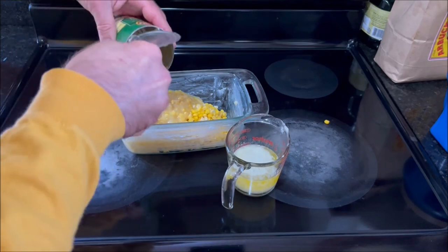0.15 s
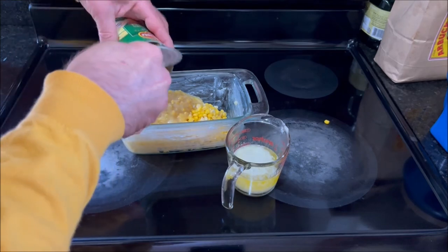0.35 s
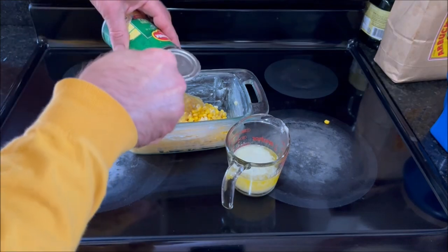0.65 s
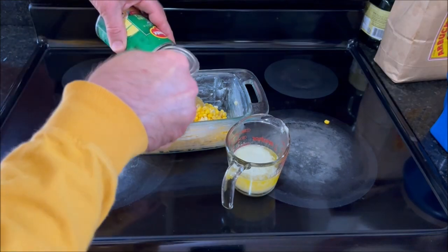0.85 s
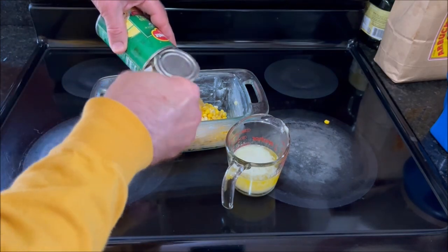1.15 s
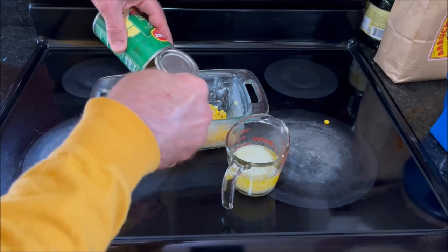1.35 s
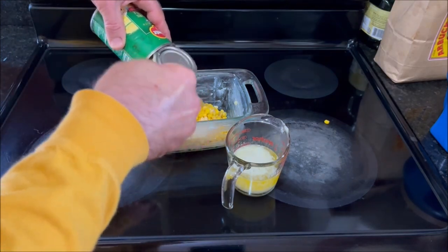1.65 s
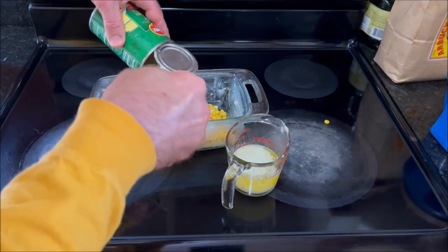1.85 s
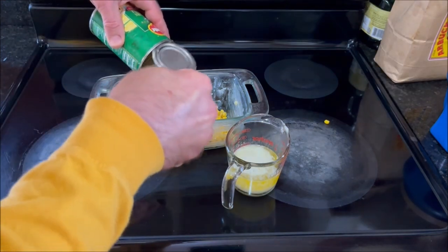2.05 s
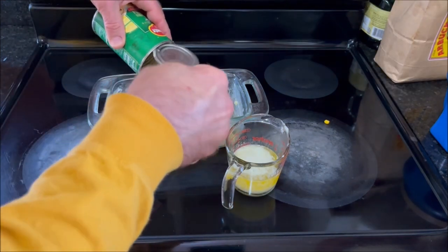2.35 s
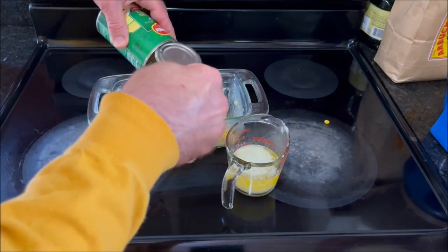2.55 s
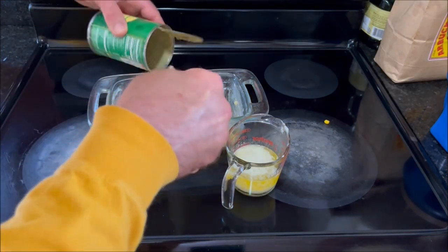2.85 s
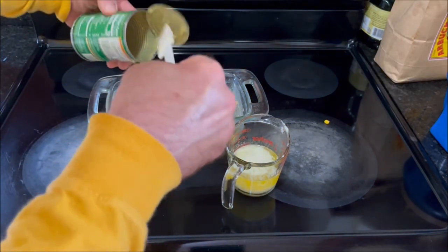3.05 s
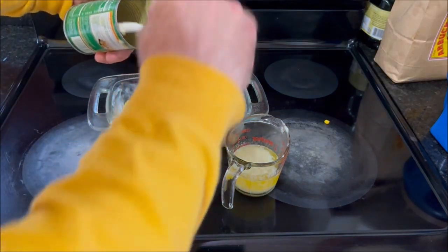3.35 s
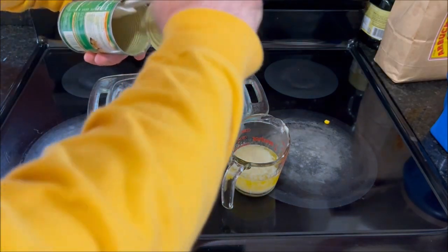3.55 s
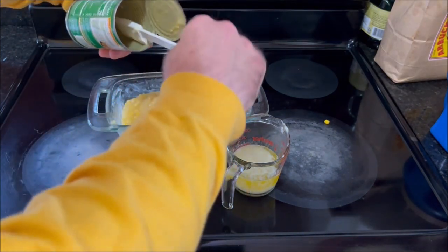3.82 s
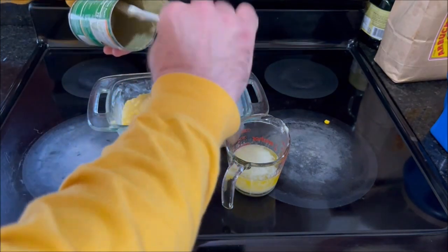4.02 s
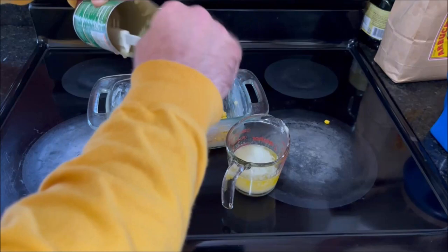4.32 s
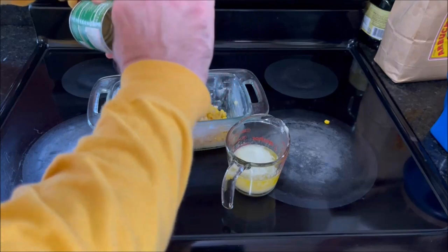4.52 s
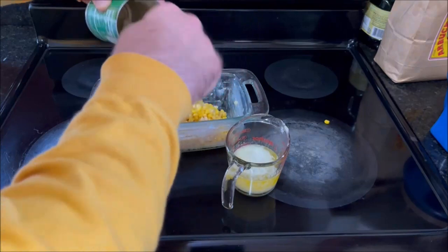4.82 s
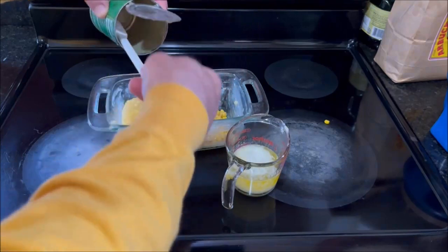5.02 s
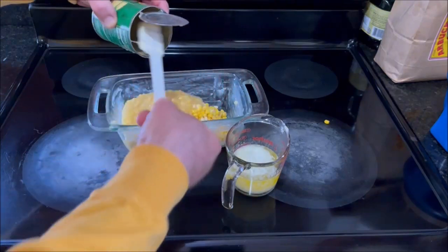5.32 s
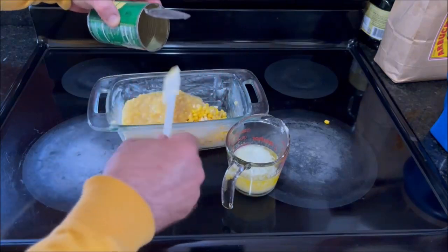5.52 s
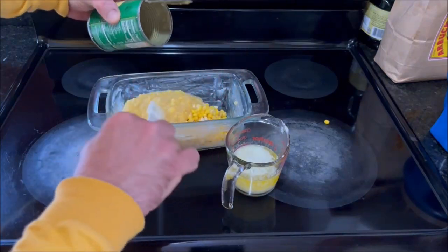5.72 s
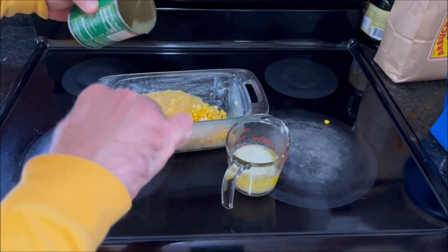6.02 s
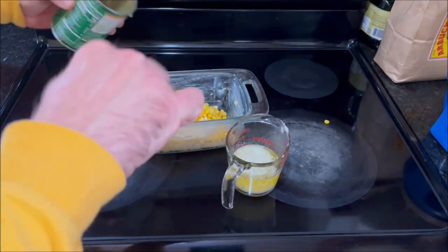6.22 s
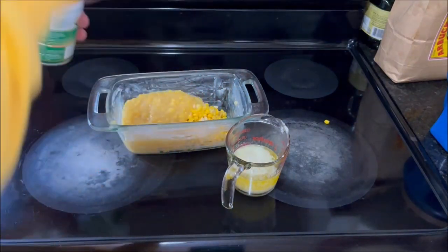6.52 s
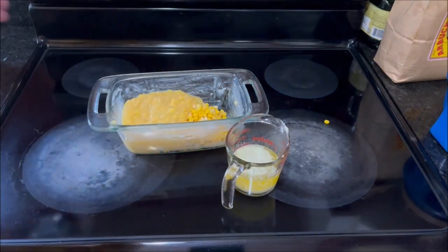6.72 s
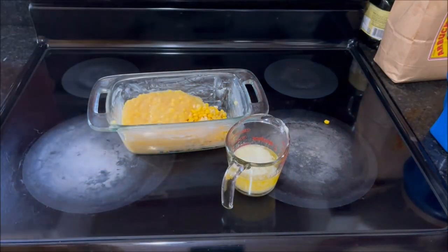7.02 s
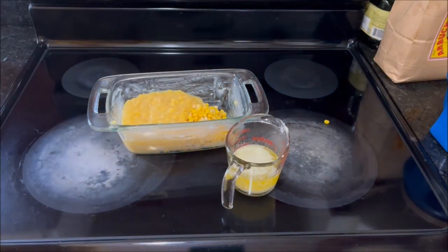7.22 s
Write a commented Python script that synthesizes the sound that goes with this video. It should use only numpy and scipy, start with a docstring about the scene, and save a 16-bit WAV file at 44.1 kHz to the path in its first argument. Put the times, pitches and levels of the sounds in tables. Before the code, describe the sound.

Close hollow metallic knocks and gritty scrapes from a spatula emptying a tin can, then soft dish thuds, a pause, and ringing final taps.

```python
"""A quiet kitchen, close on a tin can of thick creamed corn held over a stove, heard through two microphone ports.
A low hum and a wavering hiss lie under a spatula that slides and knocks in the can from the start: wall, end panel
and air column ring, with short bright crackles. The lid sings after jolts; firm drags groan and rasp, the air note
sinking while the blade blocks the mouth. Later the blade's edge ticks over ribs and rim, the spatula thuds dully into
the corn in a dish, then knocks the can again. Noise, grains and damped sines make the sounds, with a short kitchen tail."""
import sys
import numpy as np
from scipy import signal
from scipy.fft import rfft, irfft, next_fast_len
from scipy.io import wavfile
from scipy.ndimage import uniform_filter1d, map_coordinates

SR = 44100
rng = np.random.default_rng(int(sys.argv[2]) if len(sys.argv) > 2 else 0)


def store_pcm(level_fs):
    """Save levels as 16-bit WAV."""
    pcm = np.round(np.clip(level_fs, -1, 1) * 32767).astype(np.int16)
    wavfile.write(sys.argv[1], SR, np.atleast_2d(pcm).T)


N = 325281
TIME = np.arange(N) / SR
RING = TIME[:SR // 3]  # time axis of one contact
ATTACK = SR // 40  # samples over which most contacts are levelled

# Spectrum of the room's own tone. Each row: frequency in Hz, relative level in dB.
ROOM_TONE = [(20, -15.5), (70, 3), (150, -8.5), (380, -19), (700, -33.5), (2000, -43), (6000, -63)]
ROOM_TONE_DB = -59

# Light sliding and background hiss. Each row: start in seconds, nominal contact level in dB, nominal hiss in dB.
SLIDE_AND_HISS = [(0.0, -50, -69.5), (0.61, -63, -68.5), (1.599, -64.5, -81.5), (1.89, -96, -89.5),
                  (2.18, -59, -91), (2.403, -57.5, -68.5), (3.41, -82, -80.5), (3.851, -84.5, -87.5),
                  (4.681, -63, -81.5), (5.22, -59.5, -75), (5.571, -75.5, -83.5), (6.26, -100, -89.5),
                  (6.661, -70.5, -77), (6.938, -52, -68), (7.38, -53, -72)]
# Colour of the background hiss. Each row: frequency in Hz, relative level in dB.
HISS = [(1700, -3), (2250, 8), (2650, 9), (3000, -1), (6000, -1), (14200, 1), (15600, -9)]
# Pitch of the air column, lower while blade and corn block the mouth. Each row: time in seconds, frequency in Hz.
AIR_NOTE = [(.5, 655), (.93, 594.8), (1.48, 594), (1.66, 636.4), (2.06, 595.8), (3, 645), (4.82, 667.7),
            (4.955, 607), (4.995, 651), (6.85, 662.6)]
# kernels caught under the blade: level against the sliding, ring time of the air, share by which its note varies
CATCH_DB, CATCH_T60_S, CATCH_DETUNE = 1, 0.047, 0.097

# Modes of the tin wall. Each row: frequency in Hz, relative level in dB.
TIN_MODES = [(1340, 10.5), (1860, 4.5), (2170, 3), (2800, 3.5), (3510, 1.5), (3780, -5), (4600, -1.5),
             (5050, 0), (5850, -4.5)]
# Colour of the wall's dense crack. Each row: frequency in Hz, relative level in dB.
CRACK = [(200, 0.5), (450, 11), (850, 14), (1150, 1), (1800, 7.5), (2300, 1.5), (5300, -3.5), (7500, -7),
         (9000, -42.5)]
# each mode splits into a cluster around the seam and ribs: share of spread, ring time
MODE_SPREAD, MODE_T60_S = .02, .05

# Spatula hits on the can. Each row: start in seconds, then nominal levels in dB of the air column,
# the end panel, the tin wall and the treble of the contact.
CAN_KNOCKS = [(0.086, -34, -46, -50.5, -76), (0.198, -39, -62, -49.5, -44),
              (0.241, -26.5, -40.5, -40.5, -29.5), (0.524, -41, -75, -49, -53),
              (0.887, -32.5, -59.5, -53, -63.5), (1.071, -39, -71.5, -57, -62),
              (1.234, -19, -42.5, -40.5, -36), (1.412, -29.5, -64, -53.5, -47.5),
              (1.423, -36.5, -75, -45, -51), (1.477, -35, -52, -49, -52.5), (2.05, -47, -62, -72, -90.5),
              (2.19, -38, -50.5, -53.5, -58.5), (2.755, -40, -73, -68.5, -78),
              (3.579, -43, -82, -51, -47.5), (3.666, -38, -41.5, -42.5, -36.5),
              (4.167, -41.5, -63.5, -60.5, -63.5), (4.765, -62, -56, -56, -68),
              (5.208, -36.5, -31.5, -50, -58.5), (6.833, -31.5, -23, -47, -59),
              (6.949, -31.5, -32, -38.5, -30), (7.111, -48, -39.5, -52, -43), (7.141, -65, -44, -45.5, -38),
              (7.257, -36.5, -40, -43, -45)]
# trims on those levels for air column, end panel and wall
KNOCK_AIR_DB, KNOCK_PANEL_DB, KNOCK_WALL_DB = -5, -5.5, 2.5
AIR_LAG_S = .0018  # the air answers a moment after the wall
# Corn clinging inside the can. Each row: time in seconds, share from 0 to 1.
CORN_LEFT = [(2.4, 0.7), (3.5, 0.38)]
# Colour of bright spatter. Each row: frequency in Hz, relative level in dB.
SPATTER = [(3000, -20), (6500, -5), (9300, 1), (14200, 0), (16000, -8)]
# spatter of a knock: base level in an empty can, gain when fully coated, dB per dB of treble
SPATTER_DB, SPATTER_COATED_DB, SPATTER_GROWTH = -34, 17, 0.69

# Short bright crackles, some at the attack of a hard knock, some between knocks.
# Each row: start in seconds, nominal crackle in dB, click in dB.
CRACKLES = [(0.242, -26.5, -47), (1.072, -53, -80), (1.235, -52, -48), (1.5896, -53, -50.5),
            (1.6286, -48, -47.5), (1.7663, -47, -78), (2.192, -49, -82), (2.5184, -50.5, -55.5),
            (2.957, -47.5, -58.5), (2.9702, -46, -57), (3.09, -55, -71.5), (3.185, -57.5, -82),
            (3.231, -56.5, -95), (4.603, -61, -58.5), (5.124, -36.5, -54)]
CRACKLE_DB = -9  # trim on the nominal crackle

# Jolts ring the hinged lid at a note set by its bend. Each row: start in seconds, centre frequency in Hz, level in dB.
LID_RINGS = [(0.523, 1845, -52), (1.236, 5040, -43.5), (1.414, 2930, -50), (1.48, 1910, -48),
             (2.19, 2169, -61.5), (2.192, 5090, -64.5), (3.363, 1924, -65.5), (3.668, 1399, -43.5),
             (4.416, 2440, -72), (5.123, 1793, -50.5), (6.95, 5270, -45.5), (7.114, 1720, -49.5)]
LID_T60_S, LID_WAVER = 0.15, 0.045  # ring time, share by which the note wavers

# Firm drags of the blade. Each row: middle in seconds, length in seconds, nominal air column in dB, nominal rasp in dB.
RUBS = [(0.695, 0.015, -42, -53), (0.754, 0.045, -51, -50), (0.905, 0.0051, -36.5, -63),
        (0.932, 0.014, -31.5, -51.5), (0.966, 0.022, -42.5, -47), (1.162, 0.0058, -39.5, -56.5),
        (1.183, 0.0083, -31.5, -44), (1.391, 0.0047, -36.5, -55), (1.644, 0.013, -41.5, -53.5),
        (1.681, 0.018, -42, -46), (1.713, 0.0046, -38.5, -51), (1.813, 0.0016, -43, -86),
        (2.337, 0.016, -50.5, -67), (2.616, 0.0045, -44.5, -59.5), (2.853, 0.0075, -50, -75),
        (3.024, 0.012, -52.5, -64), (3.785, 0.008, -41.5, -64), (3.825, 0.015, -53, -56),
        (4.274, 0.023, -52.5, -60.5), (4.431, 0.02, -50, -57.5), (4.811, 0.038, -47, -53.5),
        (4.976, 0.022, -37, -49), (4.995, 0.019, -29.5, -57.5), (5.112, 0.018, -66, -50.5),
        (5.17, 0.025, -61, -47), (6.779, 0.0048, -41.5, -57)]
# wet crackle of a drag against its rasp: level in an empty can, gain when fully coated
RUB_WET_DB, RUB_COATED_DB = -14, 2
# the bite ahead of each drag: extra lead time, level against the drag's slips, decay
BITE_LEAD_S, BITE_DB, BITE_T60_S = .008, -1, 0.06
BLADE_BEND = 0.012  # share by which the wall modes wander under the travelling blade

# The edge skipping over ribs and rim. Each row: start in seconds, resonance in Hz, level in dB.
EDGE_TICKS = [(3.228, 4470, -65), (3.362, 2780, -68), (4.234, 4800, -59.5), (4.297, 3080, -58.5),
              (4.765, 2220, -67), (5.098, 3700, -49), (5.124, 3350, -44), (5.144, 4970, -44.5),
              (5.165, 5300, -56.5), (5.194, 4840, -50), (7.111, 3500, -47.5), (7.203, 5030, -46),
              (7.217, 5000, -41.5)]
TICK_CHATTER_S, TICK_T60_S = .05, .006  # 60 dB decay of the chatter, and of its resonance

# Soft thuds in the dish. Each row: start in seconds, frequency in Hz, level in dB.
THUDS = [(5.943, 127, -43.5), (5.998, 382, -52.5)]

# The can at the two microphone ports. Each row: frequency in Hz, left minus right in dB, left's phase lead in radians.
PORTS = [(100, .5, 0), (600, 6, .5), (1100, 1, -.8), (1900, 2, -6), (3600, 5, -5.1), (4800, 7, -6.1),
         (8300, .5, -9.4), (15500, 0, -15.6)]
# Kitchen reverberation. Each row: band centre in Hz, level against the direct sound in dB, 60 dB decay in seconds.
KITCHEN = [(150, -11, .45), (650, -6, .38), (1500, -3, .42), (5000, -5, .4), (12000, -12, .3)]
TOP_HZ = 15900  # upper limit of the recorder


def undb(db):
    """Decibels to gain."""
    return 10 ** (np.asarray(db) / 20)


def level(x, db, size=N):
    """Scale a sound so that its first samples have this rms level."""
    return x * undb(db) / np.sqrt(np.mean(x[..., :size] ** 2) + 1e-20)


def fade(t, t60):
    """Exponential decay, 60 dB in t60 seconds."""
    return np.exp(-np.log(1000) * t / t60)


def at(curve, s):
    """Value of a control curve at time s."""
    return np.interp(s, *np.transpose(curve))


def over_hz(table, size):
    """Columns of a table along the frequency axis of a sound of this size."""
    hz, *columns = np.transpose(table)
    log_hz = np.log(np.fft.rfftfreq(size, 1 / SR) + 1)
    return [np.interp(log_hz, np.log(hz), c) for c in columns]


def colour(x, table, size=1024):
    """Causal filter with the given spectrum, made minimum phase by folding its cepstrum."""
    cepstrum = irfft(np.log(undb(over_hz(table, size)[0])))
    cepstrum[1:size // 2] *= 2
    cepstrum[size // 2 + 1:] = 0
    impulse = irfft(np.exp(rfft(cepstrum)))
    return signal.fftconvolve(x, impulse)[:len(x)]


def resonate(x, hz, t60):
    """One damped mode driven by x."""
    pole = np.exp((2j * np.pi * hz - np.log(1000) / t60) / SR)
    return signal.lfilter([1], [1, -pole], x).real


def struck(hz, t60, build):
    """A mode that builds up over a short push and dies away."""
    return np.sin(2 * np.pi * hz * RING) * fade(RING, t60) * (1 - fade(RING, build))


def walk(rate, size=N):
    """Smooth random wander with a spread near 1."""
    hold = max(int(SR / rate), 1)
    steps = np.repeat(rng.standard_normal(size // hold + 2), hold)
    return uniform_filter1d(steps, hold)[:size] * np.sqrt(3 / 2)


def grains(per_s, spread_db, size=N):
    """Tiny impulses at random moments, some larger than the rest."""
    size_db = spread_db * rng.uniform(-1, 1, size)
    happens = rng.random(size) < per_s / SR
    return happens * np.sign(rng.standard_normal(size)) * undb(size_db)


def add(track, s, x):
    """Mix a sound into a track from time s on."""
    start = max(int(s * SR), 0)
    track[start:start + len(x)] += x[:max(N - start, 0)]


def room_tone():
    """Low rumble, most alike at both ports in the bass, with a wavering hum and a trace of hiss."""
    mid, side = rfft(rng.standard_normal((2, N)))
    width = undb(over_hz([(60, -18), (130, -13), (300, -7), (1000, -1)], N)[0])
    pair = (mid + width * side * np.array([[1], [-1]])) * undb(over_hz(ROOM_TONE, N)[0])
    hum = 0
    for hz, db in [(70, -62.0), (122, -76.5)]:
        strength = undb(db + walk(21))
        hum = hum + strength * np.sin(2 * np.pi * hz * TIME + 2.0 * walk(5.0))
    return level(irfft(pair, N), ROOM_TONE_DB) + hum


def background_hiss():
    """A background hiss of coloured noise that rises and falls, strongest near 2.5 kHz."""
    s, _, hiss_db = np.transpose(SLIDE_AND_HISS)
    hiss = colour(rng.standard_normal(N), HISS) * undb(2 * walk(120) + 1.5 * walk(12))
    return level(hiss, 1.2) * undb(np.interp(TIME, s, hiss_db))


def tin(force, modes_db):
    """The wall answers with a dense crack and with clusters of close modes that differ from contact to contact."""
    hz, db = np.repeat(TIN_MODES, 6, axis=0).T[:, :, None]
    detune, sign = rng.standard_normal((2, *hz.shape))
    waves = np.sin(2 * np.pi * hz * (1 + MODE_SPREAD * detune) * RING)
    modes = (undb(db) * np.sign(sign) * waves).sum(0)
    ringing = signal.fftconvolve(force, modes * fade(RING, MODE_T60_S))[:len(force)]
    return level(colour(force, CRACK), 0) + level(ringing, modes_db)


def catches(count):
    """Each kernel that catches finds the mouth covered differently and sounds its own short hollow note."""
    out = np.zeros(N)
    times = rng.uniform(0, N / SR, count)
    for s, (detune, strength) in zip(times, rng.standard_normal((count, 2))):
        note = struck(at(AIR_NOTE, s) * (1 + CATCH_DETUNE * detune), CATCH_T60_S, 0.03)
        add(out, s, note * undb(3 * strength))
    return out


def slide():
    """Light contact keeps the can murmuring; kernels catch in small hollow blips."""
    s, contact_db, _ = np.transpose(SLIDE_AND_HISS)
    grit = tin(grains(per_s=900, spread_db=9), modes_db=-6) * undb(4.5 * walk(40))
    # the hand shifts its grip with a dull rustle
    grip = colour(rng.standard_normal(N), [(100, -12), (220, 0), (480, 0), (2000, -45)])
    contact = level(grit, -13.5) + level(catches(count=450), CATCH_DB) + level(grip, -10.0)
    return contact * undb(np.interp(TIME, s, contact_db))


def knocks():
    """Each hit chatters briefly and rings wall, end panel and air; the emptier the can, the less it spatters."""
    out = np.zeros(N)
    for s, ring_db, panel_db, wall_db, treble_db in CAN_KNOCKS:
        air_hz, air_db = at(AIR_NOTE, s), ring_db + KNOCK_AIR_DB
        chatter = grains(per_s=15000, spread_db=0.5, size=len(RING))
        chatter = chatter * fade(RING, 0.051) * (1 - fade(RING, 0.011))
        wall = level(tin(chatter, modes_db=-8.5), wall_db + KNOCK_WALL_DB, size=ATTACK)
        # a hard contact is short and bright, one cushioned by corn is dull
        hardness_db = treble_db - wall_db
        wall = colour(wall, [(800, -2), (2300, 0), (4800, hardness_db + 2), (9000, hardness_db - 2)])
        # a blade deep in the mouth lowers and damps the air column, and bends the hand-held body more
        opening = air_hz / 650
        air = level(struck(air_hz, 0.065 * opening ** 8, 0.18), air_db, size=ATTACK)
        flex_db = air_db - 11.0 + 70 * (1 - opening)
        flex = level(struck(535, 0.047, 0.076), flex_db, size=ATTACK)
        panel = struck(874, 0.105, 0.04) + undb(-1) * struck(780, 0.025, 0.015)
        panel = level(panel, panel_db + KNOCK_PANEL_DB, size=ATTACK)
        wet_db = SPATTER_DB + SPATTER_COATED_DB * at(CORN_LEFT, s) + SPATTER_GROWTH * treble_db
        spatter = level(colour(chatter, SPATTER), wet_db, size=ATTACK)
        add(out, s, wall + panel + spatter)
        add(out, s + AIR_LAG_S, air + flex)
    return out


def crackles():
    """Short bright crackles, some at the attack of a hard knock, some between knocks, from bursts of dense grains."""
    out = np.zeros(N)
    for s, crackle_db, click_db in CRACKLES:
        burst = grains(per_s=17000, spread_db=5.5, size=len(RING))
        burst = burst * fade(RING, 0.057) * (1 - fade(RING, 0.0024))
        crackle = level(colour(burst, SPATTER), crackle_db + CRACKLE_DB, size=ATTACK // 3)
        click = level(colour(burst, CRACK), click_db, size=ATTACK // 3)
        add(out, s, crackle + click)
    return out


def lid():
    """The thin lid sings on after a jolt, its note wavering as it flaps."""
    out = np.zeros(N)
    for s, hz, db in LID_RINGS:
        pitch = hz * (1 + LID_WAVER * walk(450, size=len(RING)))
        note = np.sin(2 * np.pi * np.cumsum(pitch) / SR) * fade(RING, LID_T60_S)
        add(out, s, level(note, db, size=ATTACK))
    return out


def bend(x, share):
    """Let all resonances of a sound wander together by this share; its middle stays in place."""
    place = np.cumsum(1 + share * walk(45, size=len(x)))
    middle = len(x) // 2
    return map_coordinates(x, [place - place[middle] + middle])


def rubs():
    """The blade bites, then sticks and slips: the air swells into a short hollow groan under a gritty rasp."""
    out, t = np.zeros(N), RING - RING.mean()
    for s, length, air_db, rasp_db in RUBS:
        air_hz = at(AIR_NOTE, s)
        swell = 1 / np.cosh(2 * t / max(length, .004))
        since_bite = t + length + BITE_LEAD_S
        bite = (since_bite > 0) * fade(np.abs(since_bite), BITE_T60_S) * undb(BITE_DB)
        pitch = at(AIR_NOTE, s + t) * (1 + .02 * walk(120, size=len(t)))
        groan = np.sqrt(2) * np.sin(2 * np.pi * np.cumsum(pitch) / SR)
        groan = groan * undb(2 * walk(160, size=len(t)))
        slips = (swell + bite) * grains(per_s=5000, spread_db=9, size=len(t))
        slips = slips * undb(4.5 * walk(220, size=len(t)))
        # deep in the can the air note is low and the wall modes sing; near the rim the end panel rings instead
        depth_db = np.clip((635 - air_hz) / 10, -3, 3)
        panel = level(resonate(slips, 864.3, 0.22), rasp_db - 11.0 - 2 * depth_db)
        wall = bend(tin(slips, depth_db - 3.0), BLADE_BEND)
        flex = level(resonate(slips, 579, 0.15), rasp_db - 4.5)
        wet_db = rasp_db + RUB_WET_DB + RUB_COATED_DB * at(CORN_LEFT, s)
        spatter = level(colour(slips, SPATTER), wet_db)
        rasp = level(wall, rasp_db) + panel + flex + spatter
        hollow = (swell + 0.28 * bite) * groan * undb(air_db)
        # short drags carry less rasp over the whole span
        add(out, s + t[0], hollow + rasp * np.sqrt(np.mean(swell ** 2)))
    return out


def ticks():
    """The edge of the blade chatters briefly into one broad resonance of the tin."""
    out = np.zeros(N)
    for s, hz, db in EDGE_TICKS:
        chatter = grains(per_s=9000, spread_db=6, size=len(RING)) * fade(RING, TICK_CHATTER_S)
        add(out, s, level(resonate(chatter, hz, TICK_T60_S), db, size=ATTACK // 3))
    return out


def thuds():
    """The spatula meets the dish through the corn with a dull, quickly damped thump."""
    out = np.zeros(N)
    for s, hz, db in THUDS:
        squash = rng.standard_normal(len(RING)) * fade(RING, 0.69)
        squash = colour(squash, [(250, 8.5), (800, -21.5), (1150, -14.0), (2000, -47.5)])
        thump = level(struck(hz, 0.12, 0.08), db, size=ATTACK)
        add(out, s, thump + level(squash, db - 6.5, size=ATTACK))
    return out


def kitchen(x):
    """The direct sound reaches the two ports differently; stove, counter and walls add a short diffuse tail."""
    size = next_fast_len(N + SR)
    balance_db, lead = over_hz(PORTS, size)
    gain = undb(np.array([balance_db, -balance_db]) / 2)
    ports = gain * np.exp(.5j * np.array([lead, -lead]))
    ports /= np.sqrt(np.mean(np.abs(ports) ** 2, axis=0))
    t, tail = TIME[:SR // 2], 0
    noise = rfft(rng.standard_normal((2, len(t))))
    # overlapping bands, each peaking at one row of the table
    centres = np.array(KITCHEN)[:, 0]
    bands = over_hz(np.column_stack([centres, np.eye(len(KITCHEN))]), len(t))
    for band, (_, db, t60) in zip(bands, KITCHEN):
        envelope = fade(t, t60) * (1 - fade(t, 0.011))
        tail = tail + irfft(noise * band, len(t)) * envelope * undb(db) / np.linalg.norm(envelope)
    return irfft(rfft(x, size) * (ports + rfft(tail, size)), size)[:, :N]


def scene():
    """Can, dish and hiss pass through the kitchen's response, over its room tone."""
    can = slide() + knocks() + crackles() + lid() + rubs() + ticks()
    return room_tone() + kitchen(background_hiss() + can + thuds())


def record(dry):
    """The recorder cuts the top with a steep low-pass filter."""
    return signal.sosfilt(signal.ellip(8, .2, 70, TOP_HZ, fs=SR, output="sos"), dry)


dry = scene()
out = record(dry)
store_pcm(out)
```